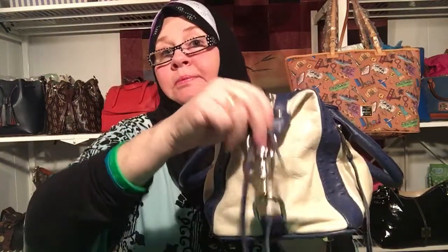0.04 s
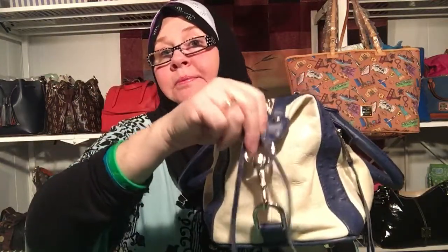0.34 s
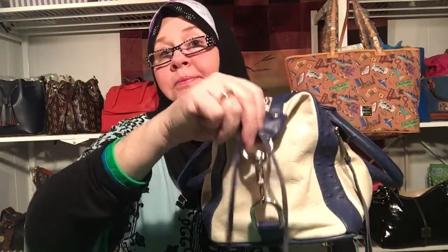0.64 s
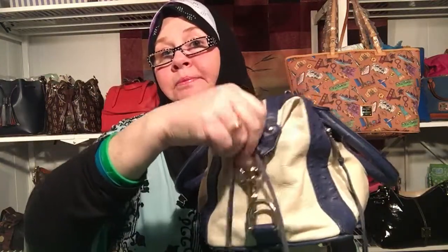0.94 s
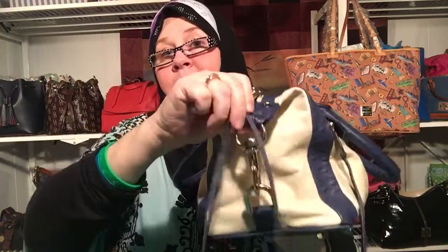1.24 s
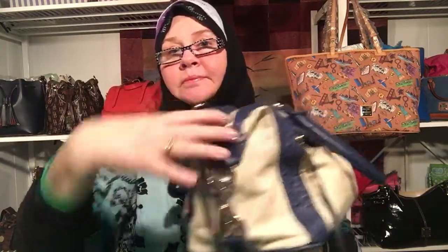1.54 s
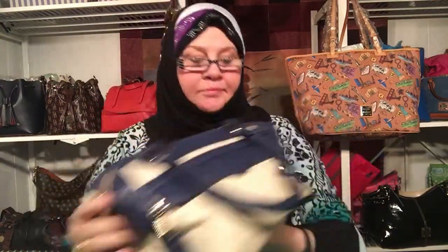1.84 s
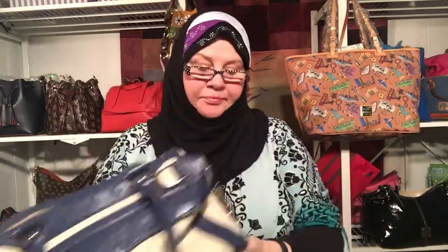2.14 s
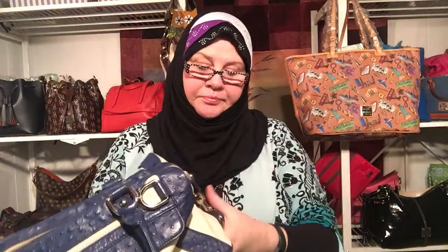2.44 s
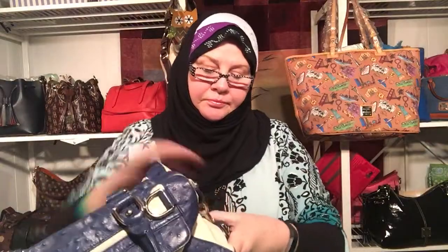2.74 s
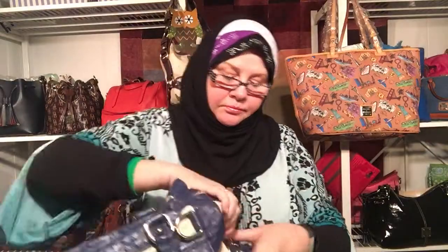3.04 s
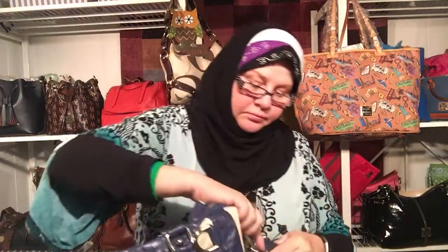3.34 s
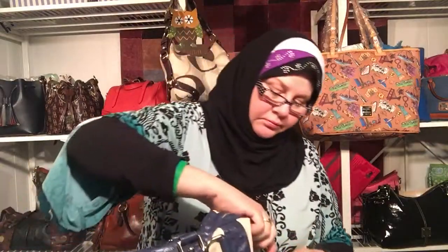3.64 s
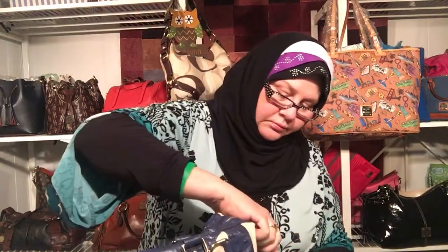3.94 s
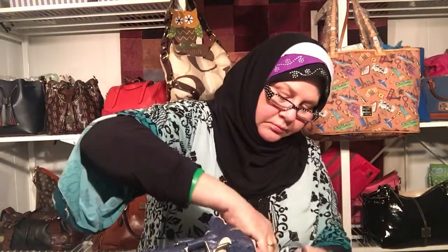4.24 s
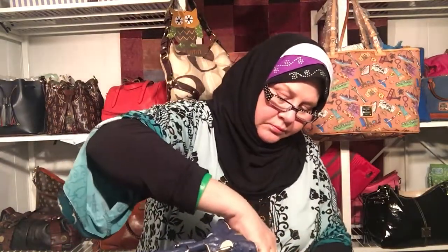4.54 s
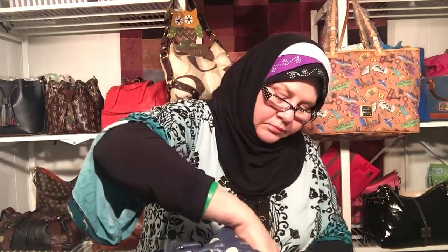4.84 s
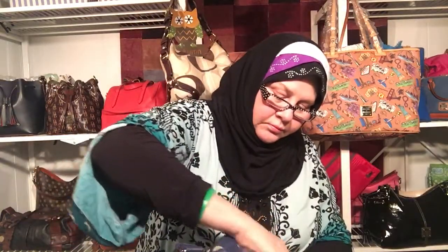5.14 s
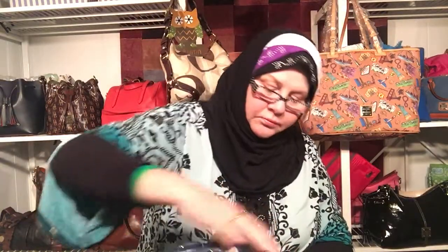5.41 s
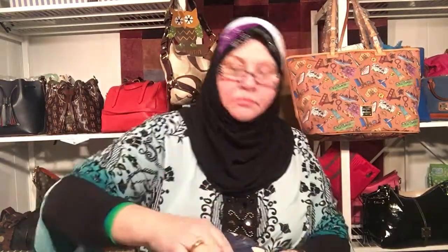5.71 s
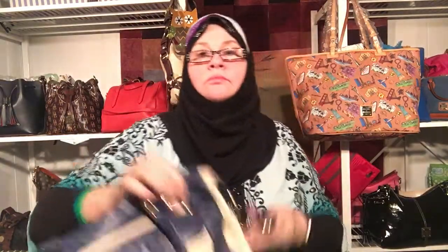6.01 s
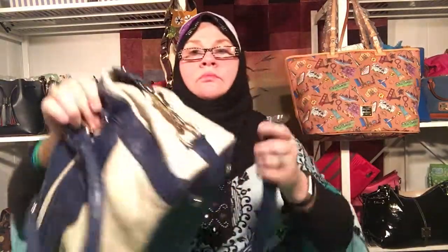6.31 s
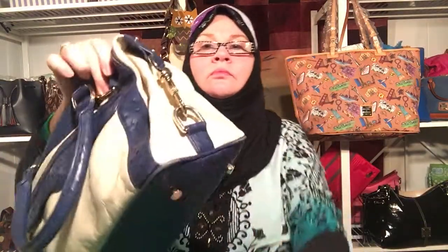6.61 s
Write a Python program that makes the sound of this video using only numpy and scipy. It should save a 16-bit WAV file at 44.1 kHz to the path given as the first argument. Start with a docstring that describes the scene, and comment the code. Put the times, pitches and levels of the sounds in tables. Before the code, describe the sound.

A leather handbag is handled up close, its strap clips clinking and snapping amid rustling, small creaks and soft thumps.

```python
"""Unclipping a handbag strap

A leather handbag is handled close to a phone in a small, shelf-lined room. Swivel clips and rings
strike each other, click and chime; a spring gate snaps shut. Stiff leather ticks as its folds slip,
hands and sleeves rub over it, and the hollow bag thumps softly over a faint hum and hiss."""
import sys
import numpy as np
from scipy import signal
from scipy.fft import rfft, irfft
from scipy.io import wavfile
from scipy.ndimage import uniform_filter1d

SR = 44100
rng = np.random.default_rng(int(sys.argv[2]) if len(sys.argv) > 2 else 0)


def materialize(psi):
    """Save the field psi as 16-bit PCM at rate SR to the path in sys.argv[1].

    A 1-D psi becomes a single channel; in a 2-D psi each row is a channel.
    """
    bounded = np.clip(np.atleast_2d(psi).T, -1, 1)
    quanta = np.round(bounded * 32767).astype(np.int16)
    wavfile.write(sys.argv[1], SR, quanta)


N = 294147
TIME = np.arange(N) / SR
AGE = TIME[:SR // 4]  # seconds since a contact

# Metal contacts, plus a few crisp leather ticks struck the same way. Each row: start in seconds, clack in dB, #
# clack pitch in Hz, snap in dB, brightness in dB, favoured mode in Hz, low ring in dB, high ring in dB, # ring
# time scale in seconds.
CLINKS = [(0.0033, -28.5, 2200, -37, 1, 7370, -39, -44, 0.11),
          (0.0194, -35, 2410, -36, 3, 9000, -36.5, -21.5, 0.068),
          (0.1071, -38.5, 3310, -35, 4, 9000, -46, -41, 0.16),
          (0.1196, -54, 2280, -44, -8, 9400, -45, -45, .12),
          (0.1388, -31, 2140, -45, 7, 9000, -57, -49, .13),
          (0.1554, -35.5, 1860, -31.5, -1, 9000, -29, -15.5, 0.093),
          (0.24, -41, 1890, -46.5, -2, 9000, -59, -47, 0.11),
          (0.2788, -48, 1680, -44, 1, 7630, -37, -44, 0.049),
          (0.289, -32.5, 1800, -43, -4, 9260, -48, -51, 0.19),
          (0.3177, -39.5, 2800, -44.5, -2, 9100, -54, -49, 0.049),
          (0.3838, -47.5, 2180, -51, 1, 9000, -55, -48.5, 0.16),
          (0.4281, -45, 2770, -35, 4, 7560, -33, -39, 0.048),
          (0.437, -35, 2080, -43, 2, 9150, -46, -39, .086),
          (0.559, -49, 2840, -42, 2, 7470, -36.5, -41, 0.046),
          (0.5724, -41, 2140, -51, -2, 6960, -52, -59, 0.11),
          (0.5865, -41.5, 2140, -50, 4, 9010, -59, -57, .09),
          (0.708, -42, 2180, -41, 3.5, 9000, -47, -39.5, 0.085),
          (0.9007, -49, 1760, -39.5, 4, 9020, -45, -39, 0.068),
          (0.928, -42.5, 1680, -40.5, -1, 9290, -42, -33.5, 0.083),
          (1.103, -30.5, 1850, -39, 4, 9300, -56, -46, 0.083),
          (1.112, -43, 2040, -38, -1, 6920, -40, -41, 0.077),
          (1.1236, -36.5, 1980, -38, 0, 9000, -42, -47, .048),
          (1.1299, -44, 2210, -40.5, -5, 9100, -56, -52, .05),
          (1.407, -48, 2050, -47, 5, 9010, -49, -37.5, .069),
          (1.428, -36, 1690, -39, 2, 9000, -59, -28.5, 0.016),
          (1.435, -65, 2690, -36, 5.5, 9000, -62, -49, .09),
          (1.4667, -36.5, 2080, -41, 1, 9100, -40, -27, 0.033),
          (1.551, -42.5, 2440, -47.5, 0, 9200, -60, -62, .12),
          (1.6777, -28.5, 3370, -47, -7, 6960, -59, -56, .04),
          (1.785, -27, 2600, -31, -8.5, 9000, -33.5, -28.5, 0.1),
          (2.22, -30.5, 2560, -62, -7, 7160, -60, -62, .11),
          (2.5476, -65, 1880, -51, -5, 6910, -35.5, -41.5, 0.13),
          (2.6377, -34.5, 1300, -33.5, -5, 9010, -44, -26.5, 0.084),
          (2.7521, -35, 2030, -53, 4, 7160, -26, -36, 0.019),
          (2.9173, -46.5, 2920, -60, -2, 9200, -64, -66, .04),
          (2.996, -50, 2200, -55, -6, 9400, -60, -58, .05),
          (3.0244, -35.5, 2080, -43, -1, 9420, -47, -47, 0.062),
          (3.1311, -45, 1790, -56, -9, 7580, -57, -51, 0.044),
          (3.147, -41, 2200, -49.5, -12, 9310, -64, -44, .044),
          (3.2089, -44, 1790, -62, -16, 9440, -68, -57, 0.24),
          (3.2319, -45.5, 2160, -55, -10, 9000, -47.5, -49, 0.12),
          (3.597, -36.5, 1840, -52, -4, 9300, -63, -63, 0.051),
          (3.7314, -42.5, 2080, -47.5, 0.5, 9410, -58, -68, 0.13),
          (4.1114, -41, 2290, -36, -7, 7080, -35, -37, 0.098),
          (4.4218, -35.5, 1170, -40, -7, 7633, -19.5, -30.5, 0.073),
          (4.5807, -42.5, 2120, -67, 0, 9110, -57, -43, 0.22),
          (4.6903, -28.5, 2520, -37.5, 2, 6990, -29.5, -33, 0.022),
          (4.783, -48, 2450, -67, -5, 9440, -73, -60, 0.071),
          (4.9267, -44, 2360, -77, 6, 7730, -64, -67, 0.18),
          (5.047, -32.5, 3200, -48, -4, 9120, -34, -35.5, 0.061),
          (5.2039, -30.5, 1700, -27.5, 1, 9400, -42.5, -50, 0.16),
          (5.408, -59, 3000, -61, 0, 7450, -45, -53, 0.14),
          (5.424, -39.5, 3130, -43.5, -4.5, 7570, -35, -39.5, 0.12),
          (5.4548, -40, 2450, -51, -2, 6950, -36, -41, 0.043),
          (5.49, -43, 1680, -53, -8, 7500, -46, -50, 0.11),
          (5.595, -44.5, 2100, -54, -6, 7670, -40, -42.5, 0.086),
          (5.7642, -40.5, 1120, -63.5, -19, 7700, -55, -68, .05),
          (5.8954, -38.5, 1860, -41.5, -8, 7460, -50, -58, 0.14)]
# Hands and sleeves on leather. Each row: start in seconds, length in seconds, body in dB, rub in dB.
STROKES = [(0, .34, -55, -58.5), (0.383, 0.24, -56.5, -60), (0.711, .06, -57, -60),
           (0.858, .07, -53, -58.5), (1.1, .05, -51, -57.5), (1.391, 0.17, -55.5, -60),
           (1.594, .23, -51.5, -55.5), (1.837, .12, -57, -48), (1.964, .3, -57.5, -52),
           (2.28, .4, -55.5, -58.5), (2.719, .18, -57, -57.5), (2.898, .1, -54, -56),
           (3.039, .22, -56, -56), (3.311, .16, -59.5, -59), (3.478, .34, -65.5, -62),
           (4.113, .08, -61, -58.5), (4.224, .5, -63, -64.5), (4.709, 0.28, -62, -61),
           (5.025, 0.055, -55, -52.5), (5.21, .2, -55.5, -56.5), (5.419, .38, -56.5, -55),
           (5.832, .24, -55.5, -52.5), (6.093, .17, -57.5, -58), (6.271, .39, -72, -65)]
# Spectra of a crisp contact edge and of treble hiss. Each row: frequency in Hz, density in dB.
EDGE_SPECTRUM = [(2500, 5.5), (4300, 10), (6500, -2.5), (9000, -10.5), (11000, -3.5), (15000, -15),
                 (17000, -38)]
HISS_SPECTRUM = [(3500, -20), (5200, -2.5), (7500, -0.5), (9200, -3.5), (10800, -7.5), (15000, -7),
                 (17000, -20.5)]


def undb(db):
    """Decibels to gain."""
    return 10 ** (np.asarray(db) / 20)


def unit(x):
    """Scale to rms 1."""
    return x / np.sqrt(np.mean(x ** 2))


def with_energy(x, span_s=0.005):
    """Scale to the energy of rms 1 held for span_s."""
    return x * np.sqrt(span_s * SR / np.sum(x ** 2))


def add(out, start_s, x):
    """Mix x into out."""
    i = max(int(start_s * SR), 0)
    out[i:i + len(x)] += x[:max(N - i, 0)]


def fade(t60_s):
    """Exponential decay after a contact."""
    return np.exp(-np.log(1000) * AGE / t60_s)


def wander(rate_hz):
    """Smooth random drift, rms 1."""
    hold = int(SR / rate_hz)
    steps = np.repeat(rng.standard_normal(N // hold + 1), hold)
    return unit(uniform_filter1d(steps, hold)[:N])


def hump(hz, near_db, far_db):
    """Broad resonance: near_db half an octave off centre, far_db an octave off."""
    return list(zip(hz * 2 ** np.linspace(-1, 1, 5), (far_db, near_db, 0, near_db, far_db)))


def response(spectrum, size=2048):
    """Minimum-phase response through (Hz, dB) points, falling 10 dB per octave beyond them."""
    hz, db = np.transpose(spectrum)
    octave, marks = np.log2(np.fft.rfftfreq(size, 1 / SR) + 1), np.log2(hz)
    beyond = np.abs(octave - np.clip(octave, marks[0], marks[-1]))
    gain = undb(np.interp(octave, marks, db) - 10 * beyond)
    cepstrum = irfft(np.log(gain))
    cepstrum[1:size // 2] *= 2
    cepstrum[size // 2 + 1:] = 0
    return np.exp(rfft(cepstrum))


def colour(x, spectrum):
    """Filter x by a spectrum."""
    return signal.oaconvolve(x, irfft(response(spectrum)))[:len(x)]


def burst(spectrum, t60_s, span_s=0.005, contact_s=0.00031, size=2048):
    """Decaying noise: the crowd of short-lived modes that one contact sets off."""
    envelope = (1 - np.exp(-AGE[:size] / contact_s)) * fade(t60_s)[:size]
    crack = irfft(rfft(rng.standard_normal(size) * envelope) * response(spectrum, size))
    return np.pad(with_energy(crack, span_s), (0, len(AGE) - size))


def hum(hz=71, level_db=-76, waver_db=5):
    """A faint low hum wavers in level and pitch."""
    rms = undb(level_db - waver_db * wander(24))
    return np.sqrt(2) * rms * np.sin(2 * np.pi * hz * TIME + wander(25))


def air(level_db=-79.5):
    """Steady hiss of room and microphone."""
    return undb(level_db) * unit(colour(rng.standard_normal(N), HISS_SPECTRUM))


def stroke_levels_db(attack_s=0.011, release_s=0.044, rest_body_db=-68, rest_rub_db=-68.5):
    """Body and rub levels: each stroke swells, holds and dies away over the resting level."""
    body_power, rub_power = undb(rest_body_db) ** 2, undb(rest_rub_db) ** 2
    for start_s, length_s, body_db, rub_db in STROKES:
        attack = np.clip((TIME - start_s) / attack_s, 0, 1)
        release = np.exp(-np.clip((TIME - start_s - length_s) / release_s, 0, 20))
        body_power += (undb(body_db) * attack * release) ** 2
        rub_power += (undb(rub_db) * attack * release) ** 2
    return 10 * np.log10(body_power), 10 * np.log10(rub_power)


def rubbing(busy_slips_per_s=1000, busy_db=-54, spread_db=4.5, slip_share=0.53, swell_db=2):
    """Friction: tiny uneven slips, denser in hard strokes, over a smoother brushing of cloth."""
    # Low and mid friction spectra. Each row: frequency in Hz, density in dB.
    body_spectrum = [(25, -21), (60, -1), (110, -2.5), (200, 1.5), (330, 0), (550, -10.5), (800, -11),
                     (1500, -55)]
    rub_spectrum = [(400, -5.5), (750, -0.5), (1300, -1.5), (2200, -1.5), (3200, -4), (4500, -9.5),
                    (7000, -19)]
    body_db, rub_db = stroke_levels_db()
    hiss_db = rub_db - 10.5 + 0.33 * (rub_db - busy_db)  # harder is brighter
    sizes = undb(spread_db * np.minimum(rng.exponential(size=N), 4))
    slipping = rng.random(N) < busy_slips_per_s / SR * undb((rub_db - busy_db) / 2)
    slips = unit(slipping * sizes * rng.choice([-1, 1], N))
    friction = slip_share * slips + (1 - slip_share) * rng.standard_normal(N)
    folds = np.zeros(N)  # folds under the hand change, so each band swells by itself
    for k, hz in enumerate(np.geomspace(700, 5000, 4)):
        band = colour(friction, hump(hz, near_db=-2.5, far_db=-20.5))
        folds += (-1) ** k * band * undb(swell_db * wander(22))
    pressure_db = 1.7 * wander(35)
    layers = ((friction, body_spectrum, body_db), (folds, rub_spectrum, rub_db),
              (friction, HISS_SPECTRUM, hiss_db))
    return sum(unit(colour(x, spectrum)) * undb(db + pressure_db + 1.6 * wander(60))
               for x, spectrum, db in layers)


def chime(modes, favoured_hz, ring_s, reach_hz=65, others_db=-17, detune_hz=12, choke=0.19, linger=1.7):
    """The contact point favours some modes; they ring until the parts settle and choke them."""
    hz, db = np.transpose(modes)
    size, detune = rng.standard_normal((len(hz), 2)).T
    favour = np.exp(-((hz - favoured_hz) / reach_hz) ** 2)
    gain = undb(db) * (favour + undb(others_db + 2 * size))
    phase = 2 * np.pi * (np.outer(hz + detune_hz * detune, AGE) + rng.random((len(hz), 1)))
    envelope = 0.62 * np.exp(-(AGE / (choke * ring_s)) ** 2) + 0.3 * fade(linger * ring_s)
    return np.sqrt(2 / np.sum(gain ** 2)) * (gain @ np.sin(phase)) * envelope


def clink(clack_db, clack_hz, snap_db, bright_db, favoured_hz, low_db, high_db, ring_s):
    # Snap spectra, low to high. Each row: frequency in Hz, density in dB.
    click_spectrum = [(2800, -23.5), (4000, 0), (5200, -3), (6600, 1.5), (8000, -8.5), (10000, -3.5)]
    tick_spectrum = [(6500, -21.5), (8500, 1.5), (9700, 2), (10500, -13.5), (11700, 1), (13500, -11.5),
                     (14800, -6.5)]
    sizzle_spectrum = [(12800, -30), (14200, -6.5), (14800, 0), (15400, -13.5), (15900, -3.5),
                       (17000, -19.5)]
    # Clip and ring modes. Each row: frequency in Hz, level in dB.
    low_modes = [(7010, -1), (7105, -0.5), (7560, 0.5), (7620, -9)]
    high_modes = [(9004, -0.73), (9157, -1.1), (9260, -1), (9425, -0.48)]
    crack = undb(clack_db) * burst(hump(clack_hz, near_db=-10, far_db=-11.5), t60_s=0.019)
    crack += undb(snap_db - bright_db) * burst(click_spectrum, t60_s=0.014)
    crack += undb(snap_db + 2) * burst(tick_spectrum, t60_s=0.012)
    crack += undb(snap_db + bright_db - 1.5) * burst(sizzle_spectrum, t60_s=0.016)
    ring = undb(low_db) * chime(low_modes, favoured_hz, ring_s, detune_hz=35.35, linger=0.73)
    ring += undb(high_db) * chime(high_modes, favoured_hz, ring_s)
    return crack + ring


def clips():
    """Clips and rings strike each other as they are flicked, opened and unhooked; a few crisp leather ticks
    sound the same way."""
    out = np.zeros(N)
    for start_s, *contact in CLINKS:
        add(out, start_s, clink(*contact))
    return out


def strap_loop(t60_s=2.5, drive_db=3, held_s=1.4):
    """The strap's big loop stores energy from each clink and sings until the hand takes the bag."""
    # Loop modes. Each row: frequency in Hz, level in dB.
    loop_modes = [(1497, -42), (2960, -43), (3515, -37)]
    kicks = np.zeros(N)
    for start_s, clack_db, *_ in CLINKS:
        add(kicks, start_s, undb([clack_db + drive_db]) ** 2)
    retained = np.exp(-2 * np.log(1000) / (t60_s * SR))
    energy = signal.lfilter([1], [1, -retained], kicks)
    ring = sum(undb(db) * np.sin(2 * np.pi * hz * TIME) for hz, db in loop_modes)
    hanging_free = np.clip((held_s - TIME) * 10, 0, 1)
    return np.sqrt(energy) * ring * hanging_free


def chatter(relative_db=-16, spread_s=0.0099, late_s=0.008, count=4):
    """Parts graze as they close and rebound: faint ticks scattered round every clink."""
    out = np.zeros(N)
    scatter = rng.standard_normal((len(CLINKS), count, 3))
    for (start_s, clack_db, clack_hz, snap_db, *_), grazes in zip(CLINKS, scatter):
        for when, size, pitch in grazes:
            spectrum = hump(clack_hz * 2 ** (pitch / 2), near_db=-4, far_db=-9)
            graze = undb(clack_db) * burst(spectrum, t60_s=0.008)
            graze += undb(snap_db) * burst(EDGE_SPECTRUM, t60_s=0.006)
            add(out, start_s + late_s + spread_s * when, undb(relative_db + 2 * size) * graze)
    return out


def swing_grazes(dangles_until_s=1.0, swing_gap_s=0.07, lead_s=0.024, relative_db=-11):
    """The dangling clip brushes its ring just before the first strike of a swing."""
    out, previous_s = np.zeros(N), 0
    for start_s, *contact in CLINKS:
        if start_s < dangles_until_s and start_s - previous_s > swing_gap_s:
            add(out, start_s - lead_s, undb(relative_db) * clink(*contact))
        previous_s = start_s
    return out


def small_creaks(over_rub_db=5.5, scatter_db=3, typical_hz=2320, scatter_octaves=0.28, count=40):
    """Folds give way at random within strokes, louder under a harder rub; returns creak rows."""
    start_s, length_s, _, rub_db = np.transpose(STROKES)
    ends_s = np.cumsum(length_s)  # strokes laid end to end
    moment_s = (np.arange(count) + rng.random(count)) / count * ends_s[-1]
    stroke = np.searchsorted(ends_s, moment_s)
    size, pitch = rng.standard_normal((count, 2)).T
    onset_s = start_s[stroke] + ends_s[stroke] - moment_s
    level_db = rub_db[stroke] + over_rub_db + scatter_db * size
    return list(zip(onset_s, level_db, typical_hz * 2 ** (scatter_octaves * pitch)))


def leather(decay_per_cycle=1.45, crumple_db=-9, edge_db_per_octave=15):
    """A fold slips: a rounded pop of a few cycles, a little crumple and a crisp edge."""
    # Louder creaks and finger taps. Each row: start in seconds, level in dB, pitch in Hz.
    creaks = [(0.3047, -40.5, 2300), (0.7818, -50, 2050), (0.8388, -53, 2880), (0.868, -47.5, 1040),
              (0.8923, -41.5, 1580), (1.1957, -45, 2470), (1.3658, -52.5, 3020), (1.4894, -39.5, 3220),
              (1.58, -39.5, 2630), (1.6116, -41, 2700), (1.6228, -32.5, 2770), (1.6361, -39, 3240),
              (1.7888, -32, 1480), (1.888, -36.5, 2310), (1.9288, -37, 2650), (1.9571, -37.5, 1980),
              (2.0594, -34.5, 1990), (2.0867, -33, 2260), (2.1283, -42.5, 2550), (2.2463, -40.5, 1710),
              (2.2867, -36.5, 1110), (2.3805, -42, 1440), (2.4278, -43, 2700), (2.6226, -26.5, 1320),
              (2.974, -43, 2250), (3.6579, -46.5, 3100), (3.7035, -44, 1990), (3.831, -41, 2020),
              (3.8746, -46.5, 1980), (3.972, -44, 2000), (4.0144, -53, 2820), (4.0478, -49.5, 2330),
              (4.1057, -34.5, 2300), (4.3876, -38.5, 1220), (4.4222, -38.5, 950), (4.5772, -37.5, 1340),
              (4.8963, -44.5, 2660), (5.1605, -44.5, 3000), (5.2785, -49.5, 1920), (5.3518, -43, 1270),
              (5.5324, -39, 1250), (5.7221, -44.5, 2330), (6.274, -40, 3080), (6.446, -46, 1206)]
    out = np.zeros(N)
    for start_s, db, hz in list(creaks) + small_creaks():
        cycles = hz * AGE
        pop = with_energy(np.sin(2 * np.pi * cycles) * cycles ** 2 * np.exp(-decay_per_cycle * cycles))
        crumple = undb(crumple_db) * burst(hump(hz, near_db=3, far_db=-4), t60_s=0.015)
        edge_db = -14.5 + edge_db_per_octave * np.log2(hz / 1830)  # tighter folds: higher, crisper
        edge = undb(edge_db) * burst(EDGE_SPECTRUM, t60_s=0.01)
        add(out, start_s, undb(db) * (pop + crumple + edge))
    return out


def bag_thumps(decay_per_cycle=2.35, span_s=0.025):
    """The hollow body booms, pitched by where it is hit, and its stiff base knocks."""
    # Bumps of the body. Each row: start in seconds, boom in dB, boom pitch in Hz, knock in dB.
    bumps = [(0.321, -50.5, 249, -68), (0.437, -48.5, 220, -76), (0.928, -56, 179, -55.5),
             (1.128, -43, 198, -53), (1.468, -49.5, 235, -65.5), (1.837, -53, 240, -48.5),
             (2.208, -48.5, 105, -52.5), (2.247, -45.5, 208, -50), (2.276, -54, 91, -46.5),
             (2.623, -36.5, 140, -40), (2.927, -48, 222, -54), (2.98, -56, 200, -45.5),
             (4.421, -48, 275, -40), (4.579, -74, 283, -52), (4.69, -64, 275, -50.5),
             (5.353, -53, 120, -56), (5.428, -47.5, 250, -48.5), (5.534, -48, 128, -52),
             (5.59, -47, 175, -51.5), (5.762, -51, 222, -45.5), (5.892, -52.5, 194, -50),
             (6.446, -64.5, 200, -63.5)]
    # Body and base spectra. Each row: frequency in Hz, density in dB.
    boom_spectrum = [(30, -19), (65, 6.5), (130, -5.5), (240, 2), (340, -9), (600, -39.5)]
    knock_spectrum = [(170, -8.5), (340, -1.5), (550, -0.5), (850, -12.5), (1500, -24.5)]
    out = np.zeros(N)
    for start_s, boom_db, hz, knock_db in bumps:
        cycles = hz * AGE
        swing = np.sin(2 * np.pi * cycles) * cycles * np.exp(-decay_per_cycle * cycles)
        rumble = burst(boom_spectrum, t60_s=0.27, span_s=span_s, size=8192)
        boom = 1.27 * with_energy(swing, span_s) + 0.71 * rumble
        knock = burst(knock_spectrum, t60_s=0.025, span_s=span_s, size=4096)
        add(out, start_s, undb(boom_db) * boom + undb(knock_db) * knock)
    return out


def gate_spring(start_s=5.2038, level_db=-28):
    """The gate's small spring sizzles on after the snap."""
    # Spring spectrum. Each row: frequency in Hz, density in dB.
    spring_spectrum = [(12500, -40), (14700, -16), (15300, -1), (15700, -4), (16500, -19.5)]
    out = np.zeros(N)
    add(out, start_s, undb(level_db) * burst(spring_spectrum, t60_s=0.11, size=8192))
    return out


def room(x, near_t60_s=0.095, tail_t60_s=0.2, wet_db=-13):
    """Quick reflections from bag and table, then the room's short tail."""
    # Reflection spectrum. Each row: frequency in Hz, gain in dB.
    wall_spectrum = [(100, -5.5), (2000, 1), (6000, -2), (9000, -8), (12000, -1.5), (16000, -8)]
    near = rng.standard_normal(len(AGE)) * fade(near_t60_s) * (AGE > 0.0015)
    tail = rng.standard_normal(len(AGE)) * fade(tail_t60_s) * (AGE > 0.006)
    reflections = undb(wet_db) * (with_energy(near, 1 / SR) + with_energy(tail, 1 / SR))
    return x + signal.fftconvolve(x, colour(reflections, wall_spectrum))[:N]


def scene():
    """Contacts in the room, plus the singing loop, rubbing, hum and hiss; mono."""
    metal = clips() + chatter() + swing_grazes() + gate_spring()
    contacts = room(metal + leather() + bag_thumps())
    return (contacts + strap_loop() + rubbing() + hum() + air())[None]


def record(dry, cutoff_hz=15900):
    """The phone cuts the very top."""
    return signal.sosfilt(signal.ellip(8, 0.2, 70, cutoff_hz, fs=SR, output="sos"), dry)


dry = scene()
out = record(dry)
materialize(out)
```